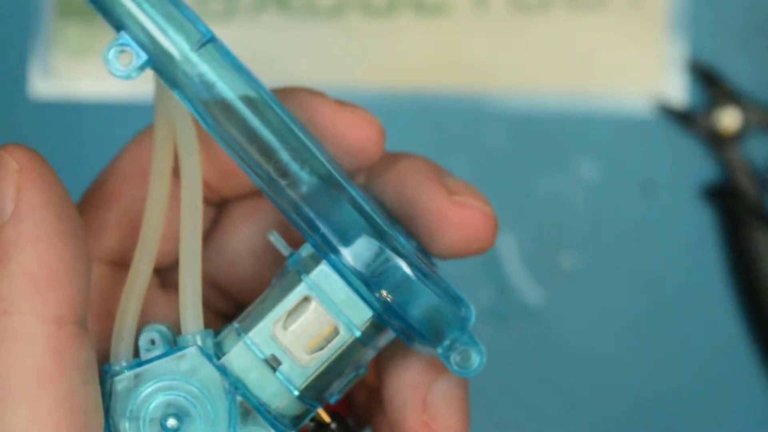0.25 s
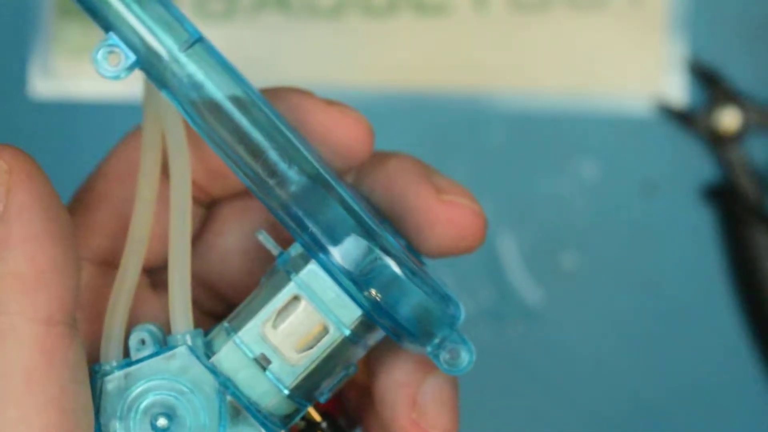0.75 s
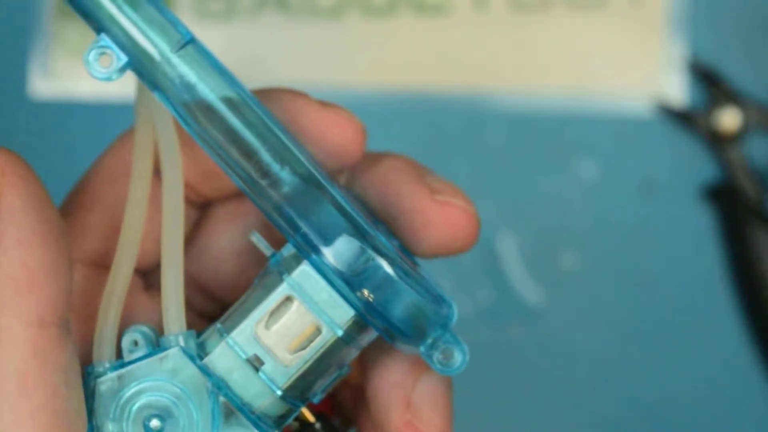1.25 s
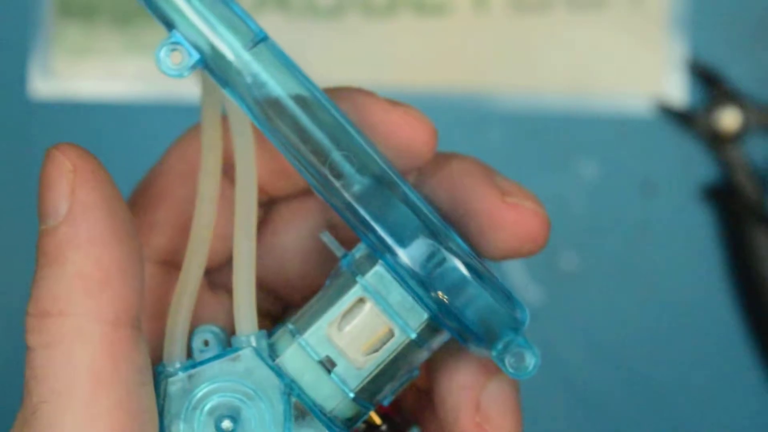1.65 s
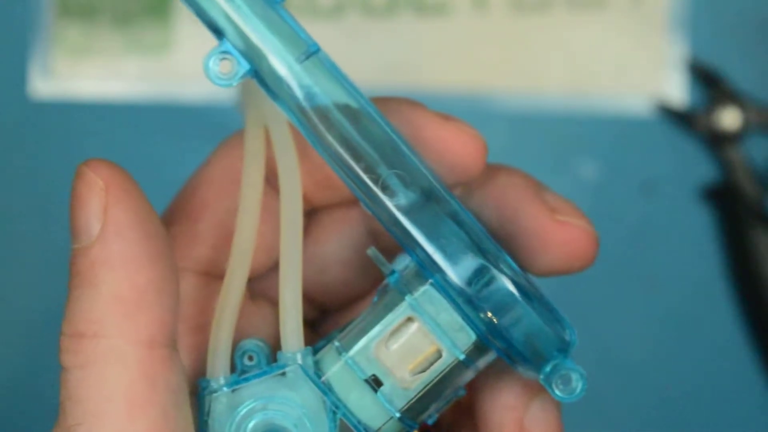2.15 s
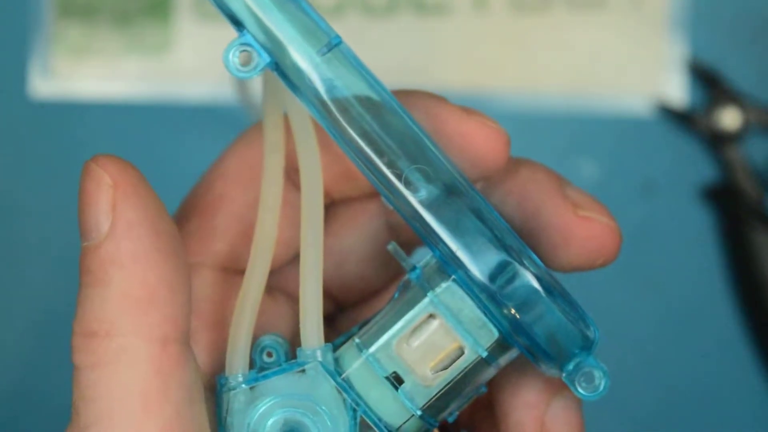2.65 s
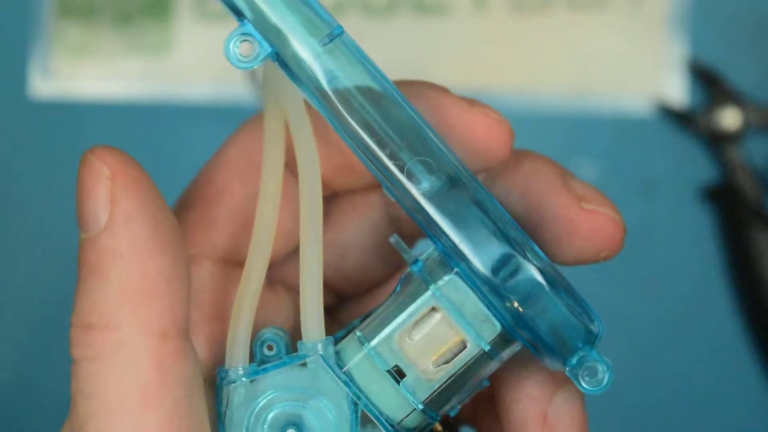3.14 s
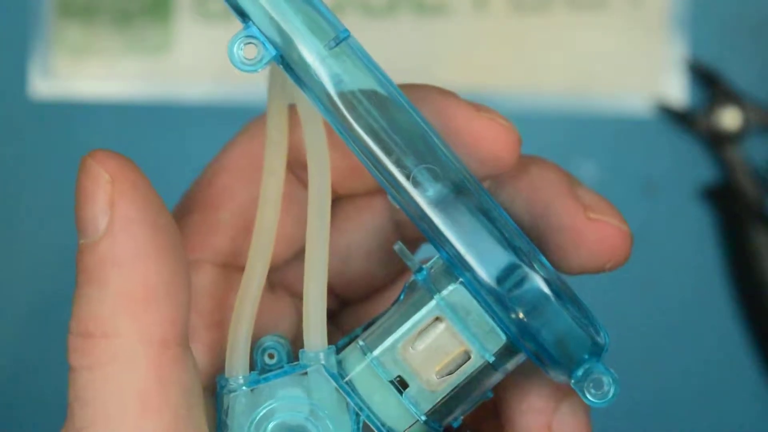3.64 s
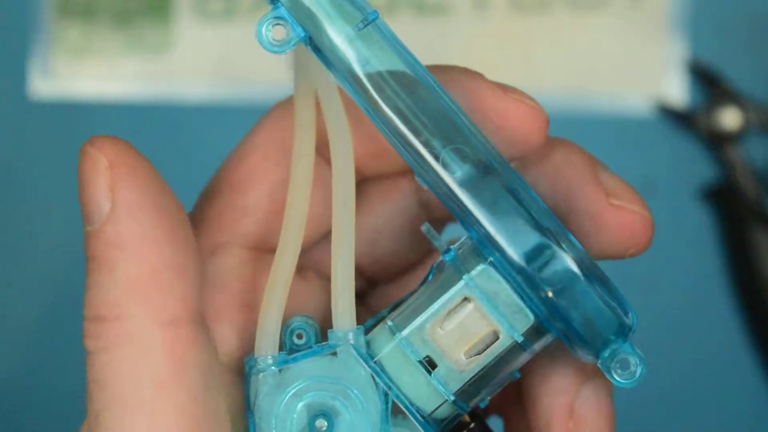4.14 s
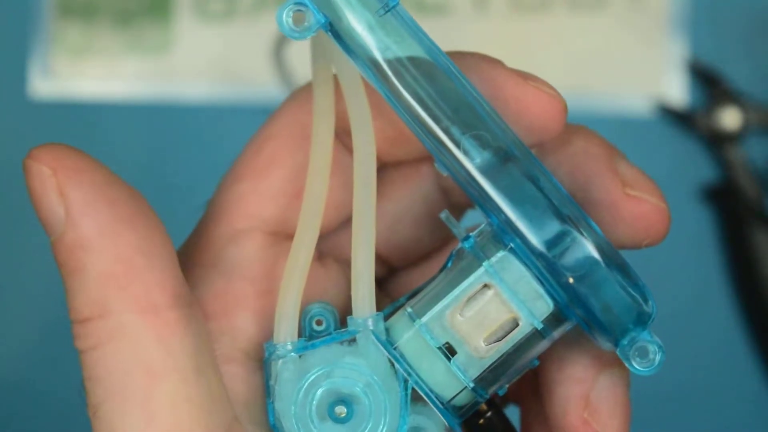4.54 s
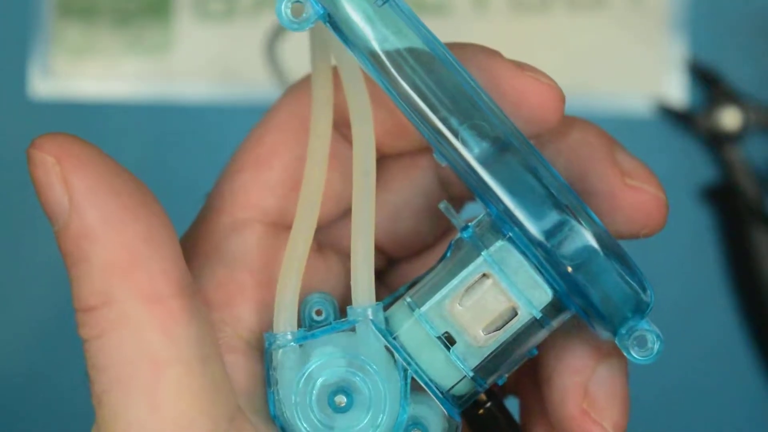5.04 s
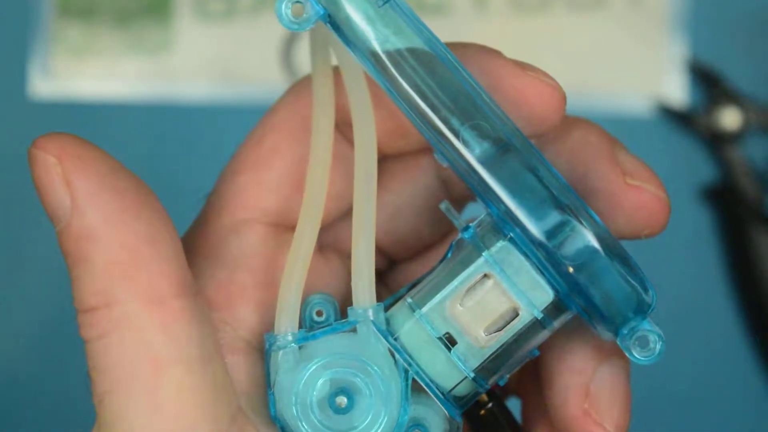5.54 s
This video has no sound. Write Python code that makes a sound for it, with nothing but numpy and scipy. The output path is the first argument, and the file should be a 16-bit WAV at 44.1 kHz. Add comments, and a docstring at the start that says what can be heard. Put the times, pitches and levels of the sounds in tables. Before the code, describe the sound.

Tiny motor and plastic gears heard close at a workbench: a quick rising start, then a bright grinding rasp and gliding whine that slows and recovers in uneven cycles. Small dry clacks and rattling come in bouts, a springy high ring colours the first two seconds, and one muted handling bump falls late. The motor is still running at the end; the room is quiet and dry.

```python
"""The main source is the gear train of a plastic toy pump, driven by a small DC motor and held over a workbench.
It spins up, then slows and recovers with each stroke: friction of gears and brushes is broadband noise, the teeth
and rotor give gliding harmonics, and the shell filters both into rasp, whine and a drone that grows under load.
The loose big gear rattles by one damped impact a turn, and brush springs ring. Beneath lie one soft bump,
made of decaying noise, and the bench: supply hum as wavering sines over quiet room noise."""
import sys
import numpy as np
from scipy import signal
from scipy.fft import rfft, irfft, next_fast_len
from scipy.io import wavfile
from scipy.ndimage import map_coordinates

SR = 44100
rng = np.random.default_rng(int(sys.argv[2]) if len(sys.argv) > 2 else 0)


def to_wav(sig):
    """Store sig (one row per channel, or 1-D mono) as 16-bit WAV at the path in sys.argv[1].

    Samples outside -1..1 are clipped; the rate is SR.
    """
    pcm = np.clip(np.atleast_2d(sig), -1, 1) * 32767
    pcm = np.round(pcm).astype(np.int16)
    wavfile.write(sys.argv[1], SR, pcm.T)  # frames by channels


N = 255339

# supply and room hum: f/Hz, rms level/dB
HUM_TONES = [(59.2, -81.5), (118.4, -79.5), (161.5, -79), (285.3, -76)]
# spectrum of the room noise: f/Hz, relative level/dB
ROOM_SPECTRUM = [(25, -16), (60, -2), (100, -2), (170, 0), (300, 2), (450, -2), (620, -3.5), (1000, -6.5),
                 (2000, -11), (6000, -33), (15000, -29)]
# spectrum of the soft bump: f/Hz, relative level/dB
BUMP_SPECTRUM = [(60, -26), (130, -5), (220, -5), (340, -1), (460, -11), (600, 3), (800, -10), (1020, -7),
                 (1300, -17), (2500, -47)]
TOP_HZ = 15750  # upper band limit

# teeth on the big gear; rotor turns per gear turn
TEETH, RATIO = 29, 3
# spin-up of the big gear: first and top speed (turns/s), duration (s)
START_SPEED, TOP_SPEED, SPIN_UP_S = 9.25, 44.56, 0.39
# pump strokes: middle of the slowing t/s, its duration/s, loaded speed/(turns/s),
# middle of the recovery t/s, its duration/s, free speed/(turns/s)
PUMP_STROKES = [(0.662, 0.51, 33.74, 0.986, 0.173, 38.42), (1.363, 0.157, 32.35, 1.801, 0.252, 42.17),
                (2.204, 0.322, 34.15, 2.638, 0.225, 40.64), (3.0, 0.214, 34.28, 3.4, 0.236, 41.96),
                (3.813, 0.461, 32.52, 4.298, 0.46, 42.9), (4.596, 0.14, 40.71, 4.83, 0.44, 53.5),
                (5.245, 0.31, 42.6, 5.587, 0.205, 48.98)]
# gear turns per stroke; turn on which the first stroke begins; reference speed (turns/s)
STROKE_TURNS, FIRST_TURN, CRUISE = 30.4, 4.5, 40
BUILD_SHARE = 0.58  # share of a stroke in which the pressure builds
START_DB, SWELL_S = -14.5, 0.15  # the drive starts this much quieter (dB), and swells in this time (s)
# level laws of the drive: base level/dB unloaded at the reference speed,
# added level/dB at full pressure, added level/dB per doubling of speed
RASP_LEVEL_LAW = (-49, -0.39, 2.8)
DRONE_LEVEL_LAW = (-61.5, 7.4, 0.46)
TEETH_LEVEL_LAW = (-50, 0.55, 3.2)
ROTOR_LEVEL_LAW = (-50, 0.54, 1.44)
# teeth running slack, mostly as the pump lets go: middle t/s, half length/s,
# change of rasp level/dB, change of whine level/dB
SLACK_SPELLS = [(0.102, 0.12, -0.5, -18), (0.598, 0.077, -2, -14), (1.01, 0.059, -1.5, -2.5),
                (1.154, 0.089, -2.5, -5), (1.61, 0.11, -1.5, 2.5), (1.863, 0.066, -5.5, -22),
                (2.75, 0.14, -1.5, -7), (3.44, 0.059, -3, -13), (3.863, 0.075, -1, -4),
                (4.38, 0.1, -1, -10), (5.39, 0.03, -1, -1)]
# slow drift of the drone: t/s, added level/dB
DRONE_LEVEL_DRIFT = [(0, 1), (0.7, 6), (1.5, 4), (2.3, 3), (3.1, 3), (3.9, 1), (4.6, 4.5), (5.3, 5.5),
                     (5.79, 3.5)]

# broad radiation of the plastic shell: f/Hz, gain level/dB
SHELL_GAIN = [(300, -66), (1100, -28.5), (1400, -20), (1750, -7), (2150, -8.5), (2400, -9), (2550, -6.5),
              (2750, -6.5), (3600, -2.5), (5300, -3), (6400, 1.5), (7400, -2.5), (8700, -10.5),
              (11500, -12), (15700, -13.5)]
# shell resonances: f/Hz, width/Hz, added level/dB at the centre
SHELL_MODES = [(1331, 43, 8), (1588, 23, 3.5), (2048, 420, 9.5), (2920, 140, 2.5), (3116, 85, 5.5),
               (4200, 480, 3.5), (4793, 240, 7.5), (5016, 90, 8.5), (5420, 76, 5.5), (6000, 130, 3.5),
               (6490, 81, 1.5), (8110, 160, 7), (8685, 220, 10), (9970, 1000, 5), (13300, 860, -0.5),
               (13800, 600, 7)]

# hard knocks of the gear against its play: t/s, relative level/dB, relative level/dB of the motor-can ring
HARD_KNOCKS = [(0.3487, -31, -12), (0.677, -34, -4), (0.8096, -34.5, 0), (0.8398, -37, 4.5),
               (0.8685, -34, 3.5), (0.9, -38, 0), (0.9298, -36.5, 2.5), (1.382, -37.5, 1),
               (1.4428, -36, -4), (2.45, -37.5, 1.5), (2.479, -39, 3), (2.538, -38, 3), (2.566, -42, 5.5),
               (2.594, -35, 2.5), (3.141, -31.5, -5), (4.792, -29.5, -15), (4.835, -28, -5),
               (5.186, -36, -29), (5.204, -28, -24), (5.2453, -28.5, -17), (5.669, -27, -14)]
# bouts of rattle: start t/s, end t/s, relative level/dB, relative level/dB of the motor-can ring
RATTLE_BOUTS = [(0.19, 0.8, -41.5, -0.5), (1.03, 1.32, -44.5, 4.5), (1.4, 1.43, -44, 2),
                (1.7, 1.79, -47.5, 5), (1.92, 2.12, -44.5, 3), (2.35, 2.69, -43, 2), (2.92, 3.33, -43, -1),
                (3.55, 3.8, -38.5, -18), (3.98, 4.32, -39.5, -3), (4.74, 4.89, -31.5, -9),
                (5.15, 5.3, -33, -14), (5.43, 5.76, -35.5, -12)]
TOUCH_DB = -59  # relative level of the light contact on all other turns
# motor-can modes excited by a contact: f/Hz, relative level/dB, t60/s
CAN_MODES = [(4185, -3.5, 0.08), (4247, -6.5, 0.045), (4330, -14, 0.017), (4850, -2, 0.032),
             (4960, -16, 0.023)]
# spectrum of the dry plastic clack: f/Hz, relative level/dB
CLACK_SPECTRUM = [(300, -43), (1300, -23), (2000, -1), (2400, -6), (2900, -0.5), (3600, -5), (4800, -3),
                  (6500, -2), (7600, -8), (10000, -17), (15700, -33)]
KNOCK_RISE_S = 0.0006  # time constant with which a contact scrapes in

# brush-spring resonances: f/Hz, width/Hz, relative level/dB
SPRING_MODES = [(5500, 340, -2), (7070, 430, -6), (8700, 74, -16), (10220, 590, -4.5), (13250, 190, -3),
                (14100, 120, -5.5)]
# strength of the spring ringing: t/s, level/dB
SPRING_LEVEL = [(0, -71), (0.25, -62), (0.5, -59), (0.85, -61), (1.3, -56.5), (1.5, -63), (2.1, -63),
                (2.6, -73), (5.79, -77)]

# unevenness of the gear train: bumps per gear turn, relative level/dB
UNEVENNESS = [(26, 6), (40, -2.5), (48, 2), (58, 0), (62, -1.5), (69, 0), (75, 6.5), (81, 1.5), (87, 5.5),
              (96, 5.5), (108, 3.5), (116, -1), (125, 4), (165, -2), (380, -9)]
# brush fizz: t/s, relative level/dB
FIZZ_LEVEL = [(0.0, -66.5), (0.26, -59), (0.44, -58.5), (0.93, -61), (1.32, -60.5), (1.43, -59.5),
              (4.22, -61), (4.89, -57.5), (5.79, -59)]
# harmonics of the meshing teeth: multiple of the tooth rate, relative level/dB
MESH_TONES = [(1, 1.5), (2, -4), (3, 1)]
# harmonics of the rotor: multiple of the rotor speed, relative level/dB
ROTOR_TONES = [(10, 3), (12, -6), (14, -8), (15, -12.5), (16, -11), (17, -13.5), (18, -18.5), (19, -11.5),
               (20, -29), (23, -14), (25, -11), (36, -14.5)]
LOOSE_PLAY = 1  # fraction by which the teeth wander more in their play at zero pressure


def amp(db):
    """Definition of level: 20 dB is a factor of ten in amplitude."""
    return 10 ** (np.asarray(db) / 20)


def unit(x):
    """Normalisation to an rms of 1."""
    return x / np.sqrt(np.mean(x ** 2) + 1e-20)


def along(points, hz):
    """Interpolation of (f, value) points on a logarithmic frequency axis."""
    f, v = np.transpose(points)
    return np.interp(np.log(hz + 1), np.log(f + 1), v)


def curves(rows):
    """Linear interpolation in time: one value per sample for each column after t."""
    s, *cols = np.transpose(rows)
    return [np.interp(np.arange(N) / SR, s, c) for c in cols]


def wobble(rate):
    """Band-limited random fluctuation: a smooth curve through rate random knots per second."""
    knots = rng.standard_normal(int(N * rate / SR) + 4)
    return map_coordinates(knots, [np.arange(N) * rate / SR])


def filtered(x, response):
    """Linear filtering: the spectrum of x is multiplied by a response of frequency."""
    m = next_fast_len(N + SR // 4)
    return irfft(rfft(x, m) * response(np.fft.rfftfreq(m, 1 / SR)), m)[..., :N]


def noise(spectrum):
    """Coloured noise: white noise shaped by a spectrum, at an rms of 1."""
    return unit(filtered(rng.standard_normal(N), lambda hz: amp(along(spectrum, hz))))


def ease(middle, length):
    """Smooth transition: a half-sine step from 0 to 1."""
    return .5 + .5 * np.sin(np.pi * np.clip((np.arange(N) / SR - middle) / length, -.5, .5))


def bench(room_db=-66):
    """Steady background: supply hum as phase-wavering sines over quiet coloured room noise."""
    t = np.arange(N) / SR
    hum = sum(amp(db) * np.sqrt(2) * np.sin(2 * np.pi * hz * t + .5 * wobble(rate=4.1))
              for hz, db in HUM_TONES)
    return hum + amp(room_db) * noise(ROOM_SPECTRUM)


def bump(start=5.227, rise=0.003, t60=0.23, db=-47.5):
    """Damped impact: the handled toy gives a soft, dull noise burst with exponential decay."""
    t = np.maximum(np.arange(N) / SR - start, 0)
    return amp(db - 60 * t / t60) * (1 - np.exp(-t / rise)) * noise(BUMP_SPECTRUM)


def shell(hz):
    """Radiation by a resonant shell: a broad hump in level with modal peaks added."""
    peaks_db = sum(db / (1 + (2 * (hz - f) / w) ** 2) for f, w, db in SHELL_MODES)
    return amp(along(SHELL_GAIN, hz) + peaks_db)


def ringing(x, wet_db=-8, t60=0.25):
    """Dense modal decay: weak modes of shell and bench ring on, so gliding tones swell and fade."""
    t = np.arange(SR // 6) / SR
    tail = rng.standard_normal(len(t)) * amp(-60 * t / t60)
    wet = signal.fftconvolve(x, tail / np.linalg.norm(tail))[:N]
    return (x + amp(wet_db) * wet) / np.hypot(1, amp(wet_db))


def knock(ring_db, clack_db=-1.0, clack_t60=0.021, detune=0.0075):
    """Impact excitation: a dry plastic clack and damped motor-can modes, each contact a little different."""
    t = np.arange(SR // 12) / SR
    pitch = 1 + detune * rng.standard_normal()
    ring = np.zeros(len(t))
    for hz, db, t60 in CAN_MODES:
        decay = amp(db + 1.5 * rng.standard_normal() - 60 * t / t60)
        ring += decay * np.sin(2 * np.pi * (pitch * hz * t + rng.random()))
    clack_gain = amp(along(CLACK_SPECTRUM, np.fft.rfftfreq(len(t), 1 / SR)))
    clack = unit(irfft(rfft(rng.standard_normal(len(t))) * clack_gain, len(t)))
    contact = amp(ring_db) * ring + amp(clack_db - 60 * t / clack_t60) * clack
    return contact * (1 - np.exp(-t / KNOCK_RISE_S))


def rattle(turn, contact=.48, hard_db=-4, bout_db=-3):
    """Backlash impacts: the gear falls through its play once a turn, lightly or in bouts, with hard knocks."""
    out = np.zeros(N + SR)
    for s, db, ring_db in HARD_KNOCKS:
        hit = knock(ring_db)
        out[round(s * SR):][:len(hit)] += amp(db + hard_db) * hit
    for i in np.flatnonzero(np.diff(np.floor(turn - contact))):
        t = i / SR
        # a hard knock takes the place of a contact within 10 ms of it
        if any(abs(t - row[0]) < .01 for row in HARD_KNOCKS):
            continue
        active = [(db, ring_db) for start, end, db, ring_db in RATTLE_BOUTS if start < t < end]
        db, ring_db = max([(TOUCH_DB, 0)] + active)
        hit = knock(ring_db)
        swell = min(t / SWELL_S, 1)
        out[i:][:len(hit)] += amp(db + bout_db + 0.95 * rng.standard_normal()) * swell * hit
    return out[:N]


def gear_speed():
    """Load on a motor: speed in turns/s rises at spin-up, then each stroke drags it down and lets it go."""
    spin_up = np.sin(np.pi / 2 * np.minimum(np.arange(N) / SR / SPIN_UP_S, 1))
    speed = START_SPEED + (TOP_SPEED - START_SPEED) * spin_up
    before = TOP_SPEED
    for grip, grip_s, loaded, release, release_s, free in PUMP_STROKES:
        speed = speed + (loaded - before) * ease(grip, grip_s) + (free - loaded) * ease(release, release_s)
        before = free
    return speed


def pressure(turn):
    """Cyclic compression, 0 to 1: geared to the motor, pressure builds in BUILD_SHARE of a stroke, then falls."""
    stroke = (turn - FIRST_TURN) / STROKE_TURNS % 1
    return .5 - .5 * np.cos(np.pi * np.interp(stroke, [0, BUILD_SHARE, 1], [0, 1, 2]))


def level(law, speed, turn):
    """Dependence of source level on load and speed: a swell at the start, then pressure and log speed."""
    base_db, pressure_db, speed_db = law
    swell_db = START_DB * np.maximum(1 - np.arange(N) / SR / SWELL_S, 0)
    return base_db + swell_db + pressure_db * pressure(turn) + speed_db * np.log2(speed / CRUISE)


def slack():
    """Loss of tooth contact: bell-shaped level changes in dB of the rasp and of the whine."""
    t = np.arange(N) / SR
    return sum(np.outer([rasp_db, whine_db], np.exp(-((t - s) / half) ** 2))
               for s, half, rasp_db, whine_db in SLACK_SPELLS)


def throb(cycle, depth_db, peak):
    """Amplitude modulation by eccentricity: an off-centre wheel presses harder once a cycle."""
    return unit(amp(depth_db * np.cos(2 * np.pi * (cycle - peak))))


def surface(turn, count, size=2048):
    """Roughness excitation: unevenness read off as the gear turns, repeating after count turns."""
    per_turn = np.arange(count * size // 2 + 1) / count
    random_phase = np.exp(2j * np.pi * rng.random(len(per_turn)))
    profile = irfft(amp(along(UNEVENNESS, per_turn)) * (per_turn < 400) * random_phase)
    return unit(map_coordinates(profile, [turn % count * size], mode="grid-wrap"))


def rubbing(turn, gear_db, brush_db, grain_db, spark_db=11.0, spark_peak=0.53):
    """Friction noise: non-repeating gear roughness, a part repeating every turn, and brush scratch."""
    # two brushes meet the same rough spot on the commutator in turn: two bursts per rotor turn
    spark = np.cos(np.pi * (2 * RATIO * turn - spark_peak)) ** 8
    grain = np.minimum(wobble(rate=2 ** 10), 1)
    brush = unit(rng.standard_normal(N) * amp(spark_db * spark + grain_db * grain))
    # 256 turns outlast the scene
    return unit(surface(turn, count=256) + amp(gear_db) * surface(turn, count=1) + amp(brush_db) * brush)


def brush_springs(turn):
    """Forced resonance: the scratch rings the thin brush springs, mostly in the first two seconds."""
    def springs(hz):
        return sum(amp(db) / (1 + (2 * (hz - f) / w) ** 2) for f, w, db in SPRING_MODES)

    scratch = rubbing(turn, gear_db=0.5, brush_db=7, grain_db=0.5)
    return amp(curves(SPRING_LEVEL)[0]) * unit(filtered(scratch, springs))


def whine(turn, teeth_db, rotor_db, cut_hz=1250):
    """Harmonic excitation by mesh and rotor: runout and play phase-modulate and smear the tooth tones."""
    runout = .42 * np.sin(2 * np.pi * turn) + .22 * np.sin(4 * np.pi * turn + 1)
    runout = runout + .12 * np.sin(2 * np.pi * RATIO * turn)
    play = .19 * wobble(rate=30) + .09 * wobble(rate=300)
    tooth = 2 * np.pi * TEETH * turn + runout + play * (1 + LOOSE_PLAY * (1 - pressure(turn)))
    teeth = sum(amp(db + 2.4 * wobble(rate=16)) * np.sin(k * tooth) for k, db in MESH_TONES)
    teeth = teeth * throb(turn, depth_db=2, peak=.68) * throb(RATIO * turn, depth_db=1.2, peak=.7)
    rotor = np.zeros(N)
    for k, db in ROTOR_TONES:
        phase = 2 * np.pi * k * RATIO * turn + 0.45 * wobble(rate=25)
        rotor += amp(db + 2.5 * wobble(rate=13)) * np.sin(phase)

    def radiated(hz):
        # the small shell hardly radiates the lowest tones until speed lifts them
        return shell(hz) * (1 - 1 / (1 + (hz / cut_hz) ** 14))

    return filtered(amp(teeth_db) * teeth + amp(rotor_db) * rotor, radiated)


def rasp(turn, rasp_db, drone_db, split_hz=2500, fizz_hz=8500, fizz_db=2.0):
    """Friction noise radiated by the shell in three bands: drone below, rasp above it, brush fizz on top."""
    def below(hz, edge):
        return 1 / (1 + (hz / edge) ** 12)

    def through_shell(x, share):
        return unit(filtered(x, lambda hz: shell(hz) * np.sqrt(share(hz))))

    drone = rubbing(turn, gear_db=11, brush_db=0, grain_db=1) * throb(turn, depth_db=3, peak=.62)
    drone = drone * throb(2 * turn, depth_db=1.5, peak=0) * throb(RATIO * turn, depth_db=1, peak=.54)
    upper = rubbing(turn, gear_db=8, brush_db=4, grain_db=4)
    # the throb deepens as the pressure rises
    upper = upper * throb(turn, depth_db=1.78 + 0.5 * pressure(turn), peak=0.84)
    upper = upper * throb(RATIO * turn, depth_db=0.47, peak=0.85)
    fizz = rubbing(turn, gear_db=1.5, brush_db=-3.5, grain_db=4.5) * throb(turn, depth_db=0.66, peak=0.99)
    low = through_shell(drone, lambda hz: below(hz, split_hz))
    middle = through_shell(upper, lambda hz: below(hz, fizz_hz) * (1 - below(hz, split_hz)))
    high = through_shell(fizz, lambda hz: 1 - below(hz, fizz_hz))
    return amp(drone_db) * low + amp(rasp_db) * middle + amp(curves(FIZZ_LEVEL)[0] + fizz_db) * high


def scene():
    """Superposition: gear angle and pump pressure govern the toy's drive; bump and bench are added."""
    speed = gear_speed()
    turn = np.cumsum(speed) / SR
    rasp_dip, whine_dip = slack()
    rasp_db = level(RASP_LEVEL_LAW, speed, turn) + rasp_dip
    drone_db = level(DRONE_LEVEL_LAW, speed, turn) + curves(DRONE_LEVEL_DRIFT)[0]
    teeth_db = level(TEETH_LEVEL_LAW, speed, turn) + whine_dip
    rotor_db = level(ROTOR_LEVEL_LAW, speed, turn)
    drive = rasp(turn, rasp_db, drone_db) + whine(turn, teeth_db, rotor_db) + brush_springs(turn)
    return np.tile(ringing(drive) + rattle(turn) + bump() + bench(), (2, 1))


def record(dry):
    """Band-limited transduction: one microphone on both channels, with faint hiss in opposite polarity."""
    hiss = amp(-72) * noise([(60, 9.5), (300, 8.5), (1000, 9.5), (4000, -54.0), (14000, 7.0)])
    return filtered(dry + np.array([hiss, -hiss]), lambda hz: hz < TOP_HZ)


dry = scene()
out = record(dry)
to_wav(out)
```